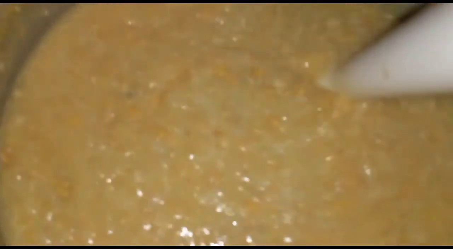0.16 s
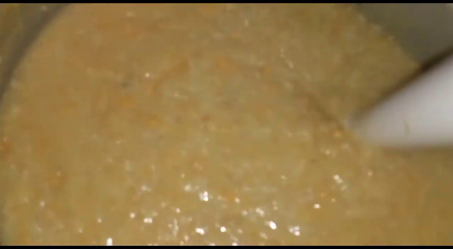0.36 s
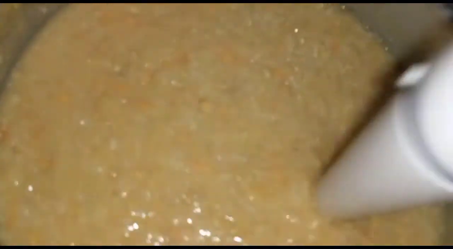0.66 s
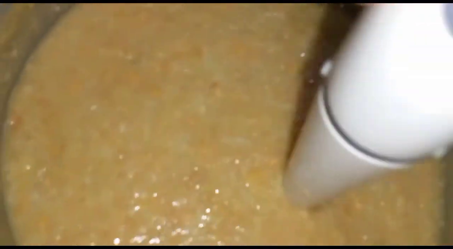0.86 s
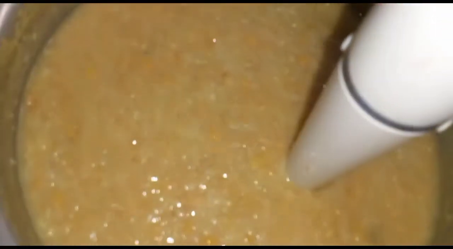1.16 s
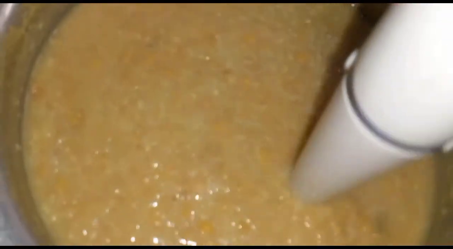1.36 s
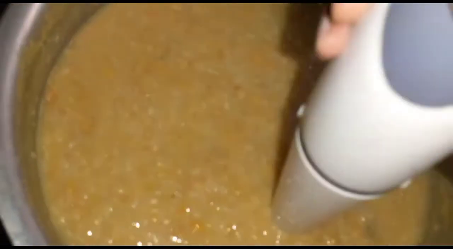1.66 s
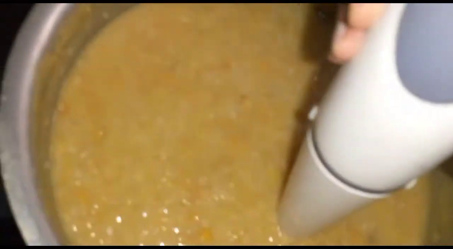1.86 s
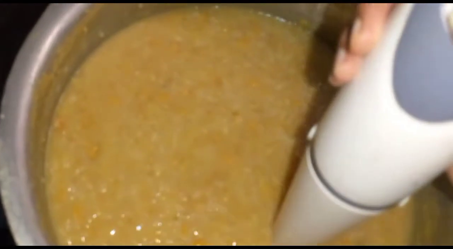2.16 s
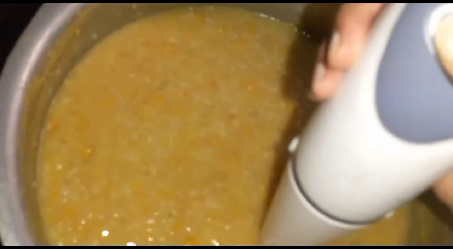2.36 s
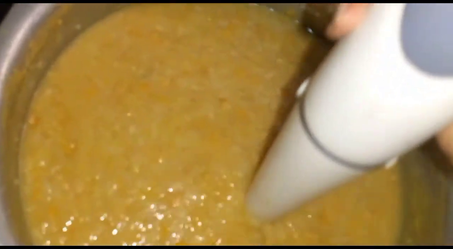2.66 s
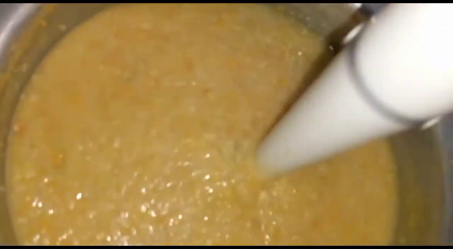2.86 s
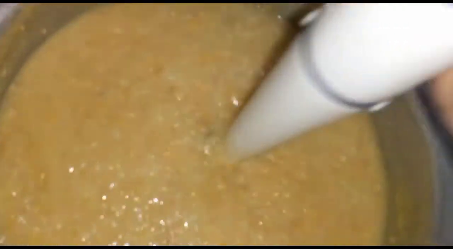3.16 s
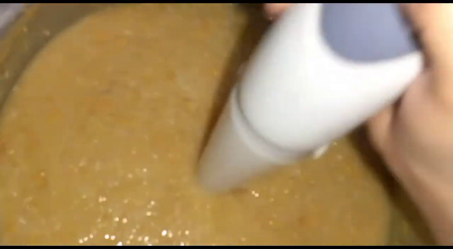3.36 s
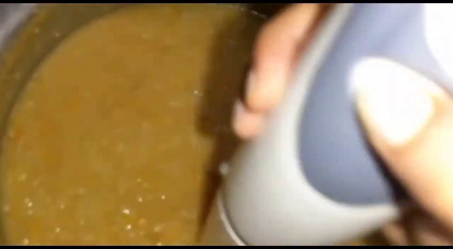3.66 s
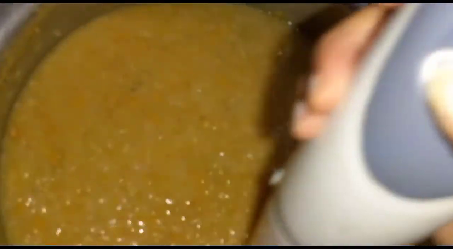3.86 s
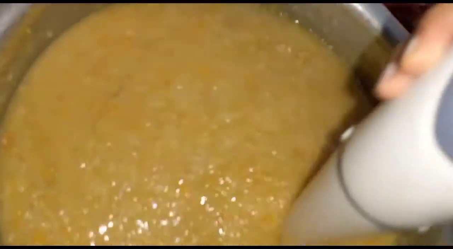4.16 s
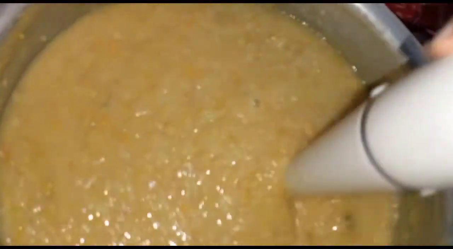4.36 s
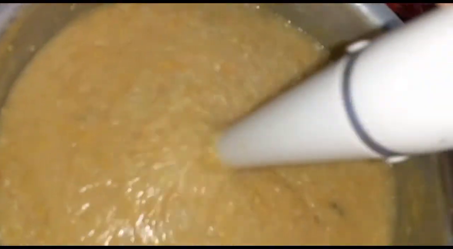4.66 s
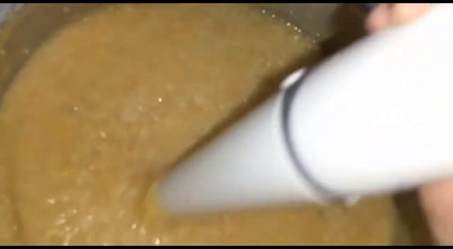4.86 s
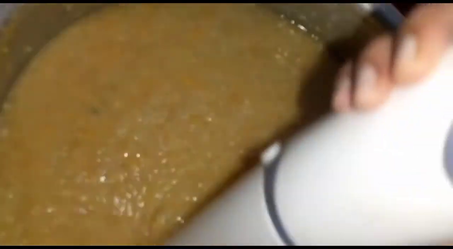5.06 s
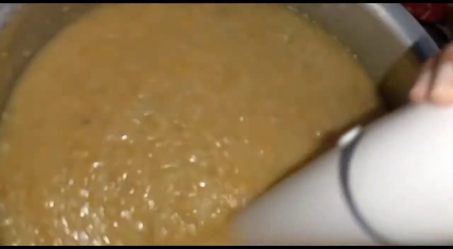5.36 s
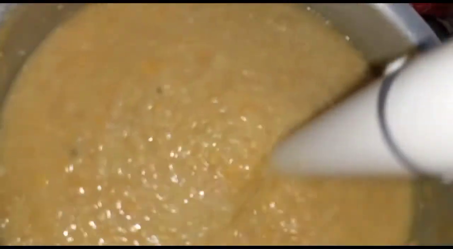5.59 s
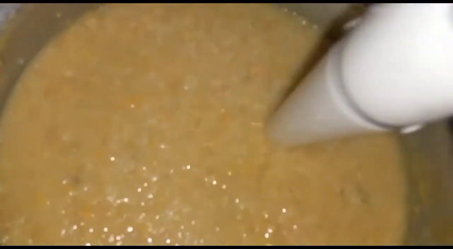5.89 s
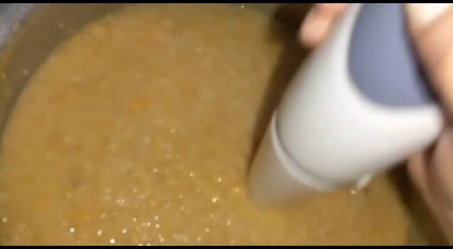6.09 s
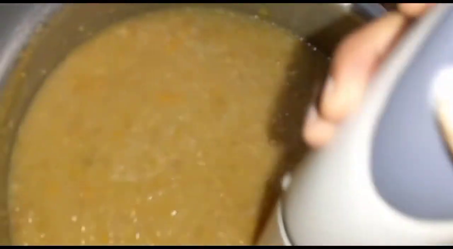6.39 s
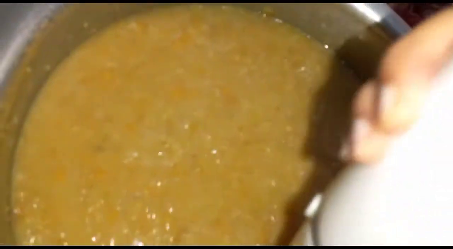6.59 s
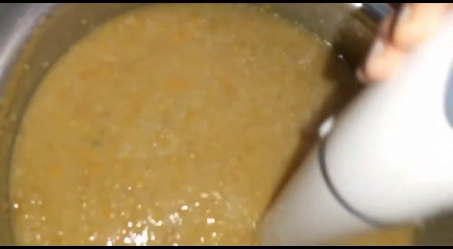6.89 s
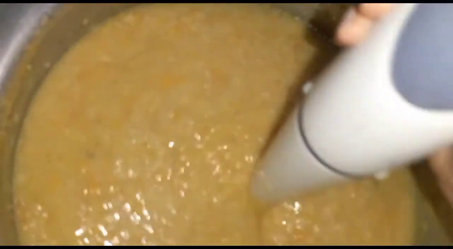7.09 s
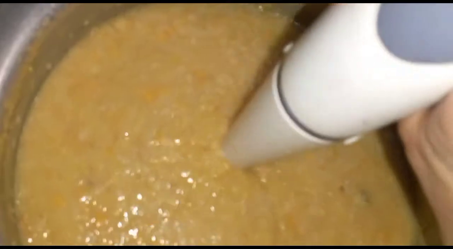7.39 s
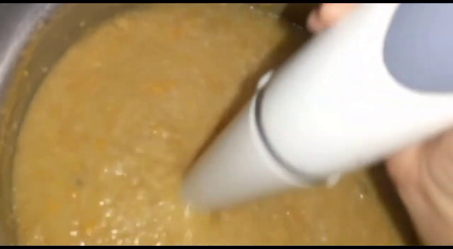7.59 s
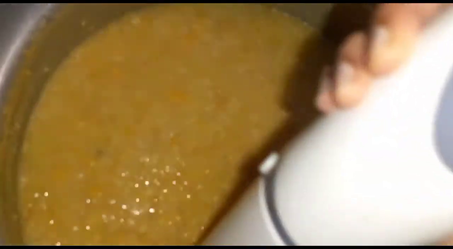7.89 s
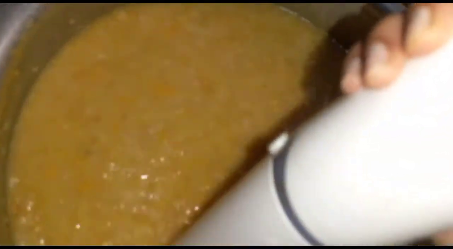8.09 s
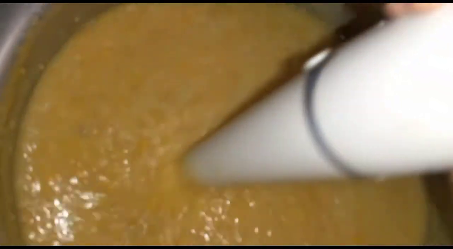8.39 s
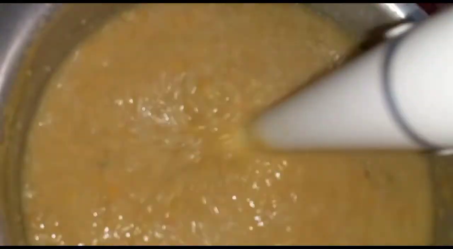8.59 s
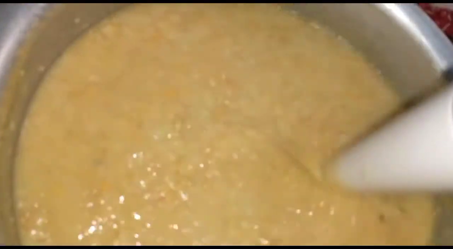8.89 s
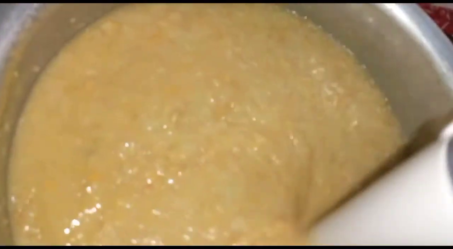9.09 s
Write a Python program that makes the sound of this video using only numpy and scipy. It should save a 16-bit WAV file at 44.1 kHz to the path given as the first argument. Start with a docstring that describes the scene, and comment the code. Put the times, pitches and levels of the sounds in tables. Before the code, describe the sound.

Four bursts of a stick blender in thick puree, heard close in a small reflective kitchen. Each starts fast and stops with a very short spin-down. The blades make a dense, gritty, wet churning that rings the metal pot, over a buzzing hum and airy motor hiss. Between bursts come soft button and pot knocks and a low appliance drone with hush; the first gap is longest.

```python
"""Stick blender in a pot of puree

A stick blender is pulsed four times in a pot of thick puree in a small hard-walled kitchen.
Sine waves tied to the turning rotor make its hum of about 200 turns a second and its whine.
Random impacts ring the pot and the blender's bell; filtered noise makes splashes and motor air.
Short noise bursts are droplets, narrow noise bands a brush squeal, and soft knocks ring the pot.
An appliance drones behind over a broad hush, which sinks after the first pulse and swells back.
"""
import sys
import numpy as np
from scipy import signal
from scipy.fft import rfft, irfft, next_fast_len
from scipy.io import wavfile

SR = 44100
rng = np.random.default_rng(int(sys.argv[2]) if len(sys.argv) > 2 else 0)


def unload_wav(signal):
    """Save mono or channel-first audio to the path in sys.argv[1] as 16-bit WAV at rate SR, clipped to [-1, 1]."""
    wavfile.write(
        sys.argv[1],
        SR,
        np.round(np.clip(np.atleast_2d(signal).T, -1, 1) * 32767).astype(np.int16),
    )


def amplitude_ratio(level_db):
    """Convert a level in decibels to the matching linear amplitude (field) ratio."""
    exponent = np.asarray(level_db, float) / 20
    return 10 ** exponent


N = 407484   # length of the scene in samples

# when the button is held: (press [s], release [s])
PULSES = [(-1.0, 0.49), (3.319, 4.47), (4.94, 6.325), (6.752, 9.09)]
# ringing modes of the pot: (frequency [Hz], width [Hz], level [dB])
POT_MODES = [(231.5, 194, -6.5), (319.7, 82, -3.5), (392.5, 56, -4), (491.6, 60, 0.5), (545.8, 11.4, 6),
             (608, 111, -3), (839, 118, -9)]
REST_TURNS_PER_S = 90   # the rotor tones are silent at this speed


def rms_one(x):
    """Scale to unit rms, so that a level can be set afterwards."""
    return x / np.sqrt(np.mean(x ** 2) + 1e-20)


def in_time(rows):
    """Draw straight lines between the rows of a time table: one curve for each column after the time."""
    s, *columns = np.transpose(rows)
    return [np.interp(np.arange(N) / SR, s, c) for c in columns]


def drift(rate_hz):
    """Slow random wandering of unit rms: noise smoothed twice, made at every 20th sample."""
    r = np.exp(-40 * np.pi * rate_hz / SR)
    noise = rng.standard_normal(N // 20 + 4002)
    slow = signal.lfilter([1], [1, -2 * r, r * r], noise)[4000:]   # skip the filter's start
    return np.interp(np.arange(N) / 20, np.arange(len(slow)), rms_one(slow))


def swell(middle_s, half_s):
    """A flat-topped bump of height 1."""
    return np.exp(-((np.arange(N) / SR - middle_s) / half_s) ** 4)


def clicks(rows, column):
    """One single-sample impulse for each row, its level in dB taken from the given column."""
    out = np.full(N, 1e-18)
    out[[round(row[0] * SR) for row in rows]] = amplitude_ratio(np.array(rows)[:, column])
    return out


def coloured(x, points):
    """Shape the spectrum of x with a table of (frequency [Hz], gain [dB])."""
    size = next_fast_len(N + 4096)
    hz, db = np.transpose(points)
    log_hz = np.log(np.arange(size // 2 + 1) * SR / size + 1)
    gain = amplitude_ratio(np.interp(log_hz, np.log(hz), db))
    return irfft(rfft(x, size) * gain, size)[..., :N]


def resonate(x, hz, width_hz):
    """Two-pole resonance with gain 1 at its top: the narrower it is, the longer it rings."""
    r = np.exp(-np.pi * width_hz / SR)
    top = np.array([1, 0, -1]) * (1 - r * r) / 2
    return signal.lfilter(top, [1, -2 * r * np.cos(2 * np.pi * hz / SR), r * r], x)


def band(x, low_hz, high_hz):
    """Band-pass filter: keep what lies between two frequencies."""
    sos = signal.butter(2, [low_hz, high_hz], "band", fs=SR, output="sos")
    return signal.sosfilt(sos, x)


def blender():
    """The whole machine: every part follows the same rotor turns and the same button."""
    speed = rotor_speed()
    turns = np.cumsum(speed * (1 + .004 * drift(25))) / SR   # turns made so far, slightly unsteady
    thud_db, rattle_db, splash_db = churn_db()
    force = lumps(1100, spread_db=3.5, turns=turns, sweep_depth=.3, swirl_db=-2) * amplitude_ratio(1.3 * drift(40))
    spray = lumps(2500, spread_db=2.6, turns=turns, sweep_depth=.17, swirl_db=-1) * amplitude_ratio(1.2 * drift(40))
    puree = pot_thud(force, thud_db) + bell_rattle(force, rattle_db) + splash(spray, force, splash_db)
    motor = rotor_hum(speed, turns) + commutator_whine(speed, turns) + motor_air(spray, rattle_db)
    return puree + motor


def rotor_speed():
    """Turns a second: spins up after a press, follows the load, coasts down after the release."""
    # running speed, lower in thick puree, higher near the surface: (time [s], speed [turns/s])
    running_speed = [(0.0, 195), (0.3, 202), (0.48, 195), (3.45, 198), (3.95, 208), (4.25, 213),
                     (4.48, 212), (5.05, 199), (5.3, 203), (6.0, 201), (6.35, 211), (6.85, 200), (7.0, 203),
                     (7.3, 213), (7.45, 215), (7.75, 206), (8.1, 203), (8.4, 202.5), (8.55, 200),
                     (9.1, 198.5)]
    spin_up_s, coast_turns_per_s2 = .022, 950
    t, running = np.arange(N) / SR, in_time(running_speed)[0]
    each = []
    for press, release in PULSES:
        spin_up = 1 - np.exp(-np.maximum(t - press, 0) / spin_up_s)
        lost = coast_turns_per_s2 * np.maximum(t - release, 0)
        each.append((running - REST_TURNS_PER_S) * spin_up - lost)
    return REST_TURNS_PER_S + np.maximum(np.max(each, axis=0), 0)


def held(bite_db, fade_db_per_s):
    """0 dB while the button is held: a quick rise after each press, a steady fall after each release."""
    bite_s = .042   # length of the rise
    t = np.arange(N) / SR
    each = []
    for press, release in PULSES:
        rise = -bite_db * np.clip(1 - (t - press) / bite_s, 0, 1)
        fall = fade_db_per_s * np.maximum(t - release, 0)
        each.append(np.where(t < press, -200, rise - fall))
    return np.max(each, axis=0)


def churn_db():
    """Levels of thud, rattle and splash, which rise after a press and die away after a release."""
    # blades in the puree: (time [s], pot thud level [dB], bell rattle level [dB], splash level [dB])
    churn_levels = [(0.0, -17, -11, -33), (0.04, -23, -18.5, -32), (0.32, -22.5, -18.5, -31),
                    (0.49, -19, -16, -34), (3.32, -20, -11, -40), (3.36, -20, -11, -17),
                    (3.54, -25, -12.5, -20.5), (3.61, -19.5, -16, -28), (4.01, -16.5, -18, -32),
                    (4.34, -23.5, -18.5, -28.5), (4.46, -16, -17.5, -30.5), (4.98, -18.5, -21, -40),
                    (5.13, -15, -20, -33), (5.25, -16, -15, -34), (5.5, -15.5, -15, -32),
                    (5.87, -17.5, -18, -34), (6.04, -17, -15.5, -22), (6.32, -20, -18, -27),
                    (6.8, -17, -19.5, -42), (7.03, -14.5, -14, -26), (7.19, -19.5, -18.5, -24.5),
                    (7.45, -23, -21, -28), (7.69, -15, -18.5, -32), (7.85, -16.5, -20, -36.5),
                    (8.28, -18, -17.5, -36.5), (8.8, -20.5, -18, -32.5), (9.1, -18, -20, -36)]
    thud_db, rattle_db, splash_db = in_time(churn_levels)
    return [thud_db + held(32, 98), rattle_db + held(32, 110), splash_db + held(18, 106)]


def lumps(per_s, spread_db, turns, sweep_depth, swirl_db):
    """Random impacts over a turbulent bed, stronger twice a turn as a blade sweeps by."""
    sizes = amplitude_ratio(spread_db * np.minimum(rng.exponential(1, N), 5)) * rng.choice([-1, 1], N)
    hits = rms_one(sizes * (rng.random(N) < per_s / SR))
    sweep = 1 + sweep_depth * np.cos(4 * np.pi * turns)
    return sweep * (hits + amplitude_ratio(swirl_db) * rng.standard_normal(N))


def body(force, modes, wander_db, low_hz, high_hz):
    """Struck modes that each swell and fade a little at random."""
    rings = 0
    for k, (hz, width_hz, db) in enumerate(modes):
        level = amplitude_ratio(db + wander_db * drift(2.55))
        rings = rings + (-1) ** k * level * resonate(force, hz, width_hz)
    return rms_one(band(rings, low_hz, high_hz))


def pot_thud(force, thud_db):
    """Lumps knock on the pot: its modes ring, and its walls shake below them."""
    thud = amplitude_ratio(thud_db) * body(force, POT_MODES, wander_db=1.2, low_hz=170, high_hz=1500)
    rumble = amplitude_ratio(thud_db - 26.5) * rms_one(band(force, 120, 190))
    return thud + rumble


def bell_rattle(force, rattle_db):
    """The same knocks ring the higher modes of the bell around the blades."""
    # ringing modes of the bell: (frequency [Hz], width [Hz], level [dB])
    bell_modes = [(935.5, 240, -9.5), (1111, 98, -3), (1188.6, 52, 0.5), (1262, 76, -2), (1383, 182, -6),
                  (1758, 590, -12)]
    return amplitude_ratio(rattle_db) * body(force, bell_modes, wander_db=1.4, low_hz=600, high_hz=3400)


def splash(spray, force, splash_db):
    """Denser impacts, with a little of the lumps' force, are filtered to a bright splashing."""
    # colour of the splash: (frequency [Hz], gain [dB])
    splash_colour = [(1300, -14), (1900, -9.5), (2200, -1.5), (2530, 3), (3150, -3), (3700, -1.5),
                     (4100, -6), (4450, -4.5), (5500, -11), (6350, -7.5), (6900, -12), (7400, -10.5),
                     (9500, -19.5), (12000, -30)]
    return amplitude_ratio(splash_db) * rms_one(coloured(spray + amplitude_ratio(-21.5) * force, splash_colour))


def rotor_hum(speed, turns):
    """Tones at one, two and three times the rotor speed; the fifth order rings out once in the bell."""
    # hum while powered: (time [s], order 1 level [dB], order 2 level [dB], order 3 level [dB])
    hum_levels = [(0.0, -38, -28, -21), (0.12, -27, -21, -30), (0.3, -29, -26, -26), (0.48, -33, -31, -33),
                  (3.4, -32, -24, -18), (3.6, -33, -27, -31), (3.85, -39, -37, -31), (4.15, -33, -42, -38),
                  (4.45, -30, -44, -23), (5.1, -40, -23, -36), (5.35, -36, -34, -19), (5.7, -43, -38, -40),
                  (6.0, -32, -22, -24), (6.3, -36, -33, -42), (6.95, -55, -30, -30), (7.3, -30, -48, -48),
                  (7.65, -34, -29, -36), (7.9, -40, -21, -36), (8.2, -25, -19.5, -30),
                  (8.78, -27, -21, -38), (8.95, -22.5, -36, -42), (9.1, -29, -24, -42)]
    orders_db = in_time(hum_levels) + held(20, 170)
    tones = np.sqrt(2) * amplitude_ratio(-17) * swell(3.49, half_s=.075) * np.sin(10 * np.pi * turns)
    for order, db in enumerate(orders_db, 1):
        phase = 2 * np.pi * order * turns + .5 * drift(12)
        tones += np.sqrt(2) * amplitude_ratio(db + 1.8 * drift(10)) * np.sin(phase)
    return tones * np.clip((speed - REST_TURNS_PER_S) / 25, 0, 1)   # silent at rest


def commutator_whine(speed, turns):
    """High tones at large multiples of the rotor speed, blurred by a fast random phase."""
    # whine tones: (order [multiple of rotor speed], level [dB])
    whine_orders = [(48, -55), (72, -53.5)]
    whine = 0
    for order, db in whine_orders:
        phase = 2 * np.pi * order * turns + 1.9 * drift(110)
        whine = whine + np.sqrt(2) * amplitude_ratio(db + 3 * drift(3)) * np.sin(phase)
    powered = np.clip((speed - 135) / 60, 0, 1)   # the brushes fall silent as the rotor coasts
    return powered * whine


def motor_air(spray, rattle_db):
    """Treble noise of the motor's air, mixed with a little spray."""
    # lowest level of the air while powered: (time [s], level [dB])
    air_levels = [(0.0, -47.5), (0.06, -36.5), (0.3, -36.5), (0.4, -47.5), (3.33, -47.5), (3.4, -37.5),
                  (3.9, -44.5), (4.4, -46.5), (5.05, -41.5), (5.9, -42), (6.3, -47.5), (7.1, -41.5),
                  (7.6, -47.5), (8.3, -42.5), (9.05, -40)]
    # colour of the air: (frequency [Hz], gain [dB])
    air_colour = [(4000, -31.5), (7000, -4), (9000, 2.5), (11000, 6), (14400, 3.5), (16000, 1.5)]
    air_db = in_time(air_levels)[0] + held(14, 70)
    air_db = np.maximum(air_db, rattle_db - 32.5)   # some hiss always goes with the rattle
    hiss = rng.standard_normal(N) * amplitude_ratio(1.7 * drift(30))
    return amplitude_ratio(air_db) * rms_one(coloured(hiss + amplitude_ratio(-11) * spray, air_colour))


def squeal():
    """The brushes squeal for a moment: noise in a few narrow treble bands."""
    # squeal bands: (frequency [Hz], width [Hz], gain [dB])
    squeal_bands = [(10860, 300, 0), (12600, 300, -1), (14180, 250, -3)]
    noise = rng.standard_normal(N)
    bands = sum(amplitude_ratio(db) * resonate(noise, hz, width_hz) for hz, width_hz, db in squeal_bands)
    return amplitude_ratio(-40) * swell(.19, half_s=.13) * rms_one(bands)


def knocks():
    """Button and soft pot knocks: a dull push sets the pot modes ringing, with a thin tick on top."""
    # strength before filtering: (time [s], push level [dB], treble tick level [dB])
    knock_times = [(0.709, -33.5, -42), (0.878, -31.5, -51), (0.89, -41, -56.5), (3.325, -33, -35),
                   (4.944, -39, -42), (6.667, -39, -52), (6.75, -50, -52)]
    push = clicks(knock_times, column=1)
    # here the modes are twice as wide, so they ring for a shorter time
    rings = sum(amplitude_ratio(db) * resonate(push, hz, 2 * width_hz) for hz, width_hz, db in POT_MODES)
    r = np.exp(-1 / (.003 * SR))   # the tick dies away in about 3 ms
    tick_shape = signal.lfilter([1], [1, -r], clicks(knock_times, column=2))
    tick = tick_shape * band(rng.standard_normal(N), 2000, 5000)
    return -amplitude_ratio(16) * band(push, 400, 1500) - amplitude_ratio(31) * band(rings, 120, 900) + amplitude_ratio(9) * tick


def droplets():
    """Ticks are 2 ms bursts of bright noise; many fainter ones fall at random while the blades churn."""
    # the clear ticks, before a small boost: (time [s], level [dB])
    droplet_times = [(3.9994, -28), (4.2915, -22), (4.4706, -29), (5.0408, -27), (5.1102, -25),
                     (5.5901, -29), (5.6595, -28), (5.7068, -21.5), (5.7746, -25), (7.0575, -20),
                     (7.9861, -26.5), (8.0809, -29), (8.2128, -30), (8.8096, -30), (8.8711, -26)]
    churning = amplitude_ratio(churn_db()[0])
    sizes = amplitude_ratio(-27 + 3.5 * np.minimum(rng.exponential(1, N), 3))
    faint = sizes * churning * (rng.random(N) < 45 / SR)   # about 45 a second
    r = np.exp(-1 / (.002106 * SR))
    shape = signal.lfilter([1], [1, -r], amplitude_ratio(.5) * clicks(droplet_times, column=1) + faint)
    return shape * rms_one(band(rng.standard_normal(N), 8000, 13000))


def kitchen(x):
    """Dense reflections that die exponentially, start 4 ms late and lose treble at the walls."""
    t60_s, wall_cut_hz = .5, 4100   # time to fall by 60 dB, top of the echoes' band
    t = np.arange(SR) / SR
    echoes = rng.standard_normal(SR) * amplitude_ratio(-60 * t / t60_s) * (t > .004)
    echoes = band(echoes, 110, wall_cut_hz)
    return signal.fftconvolve(x, echoes / np.sqrt(np.sum(echoes ** 2)))[:N]


def background():
    """A compressor drone of wavering sine tones over broad hush; both sink and swell back together."""
    # drone tones: (frequency [Hz], level before the background curve [dB])
    drone_tones = [(48.4, -59), (96.9, -62), (145.3, -52), (199.2, -64), (290.7, -64), (489.9, -70)]
    # colour of the hush: (frequency [Hz], gain [dB])
    hush_colour = [(30, -13.5), (80, -3), (200, 1), (320, -4), (550, -4.5), (850, -11), (1200, -9),
                   (1700, -14), (2550, -12), (3300, -16), (7000, -15), (10000, -13), (15500, -16)]
    # how the whole background sinks and swells back: (time [s], gain [dB])
    background_curve = [(0, -2), (.9, -5.5), (1.46, -11), (1.75, -5), (1.98, 1), (2.3, 2.5), (3.3, 3),
                        (3.6, -2), (4.9, -6), (6.75, -4), (9.24, -9)]
    t = np.arange(N) / SR
    drone = 0
    for k, (hz, db) in enumerate(drone_tones):
        phase = 2 * np.pi * hz * t + k + .3 * drift(3)
        drone = drone + np.sqrt(2) * amplitude_ratio(db + 1.2 * drift(5)) * np.sin(phase)
    hush = amplitude_ratio(-53 + 1.1 * drift(5)) * rms_one(coloured(rng.standard_normal(N), hush_colour))
    return amplitude_ratio(in_time(background_curve)[0]) * (drone + hush)


def scene():
    """Blender, squeal and knocks in the room, droplets close by, background behind."""
    near = blender() + squeal() + knocks()
    room = amplitude_ratio(-13.5) * kitchen(near)
    return (near + room + droplets() + background())[None]


def low_pass(x):
    """Removes everything above the highest recorded frequency."""
    return signal.sosfilt(signal.butter(12, 15720, fs=SR, output="sos"), x)


def record(dry):
    """The microphone rounds off loud peaks and colours the sound."""
    # thin in the deep bass, a step down in the treble: (frequency [Hz], gain [dB])
    microphone_colour = [(20, -30), (45, -3), (90, 0), (7250, 0), (7750, -8), (9500, -7), (12500, -4),
                         (15400, -4), (15600, -60)]
    rounded = 1.441 * np.tanh(dry / 1.702)
    mix = coloured(rounded, microphone_colour)
    return low_pass(mix)


dry = scene()
out = record(dry)
unload_wav(out)
```